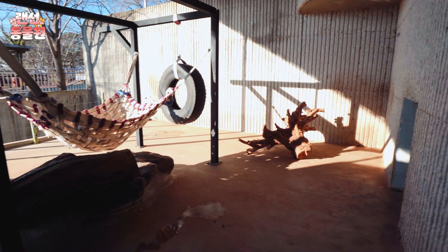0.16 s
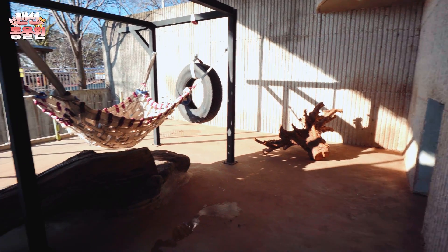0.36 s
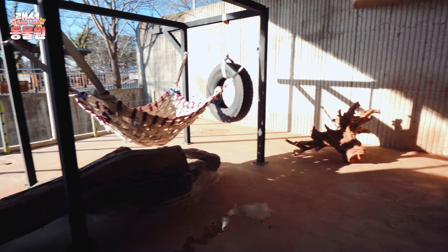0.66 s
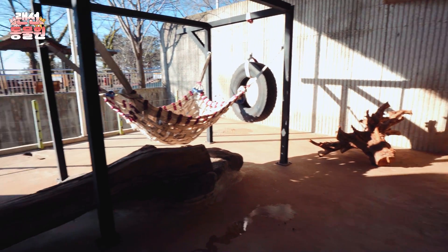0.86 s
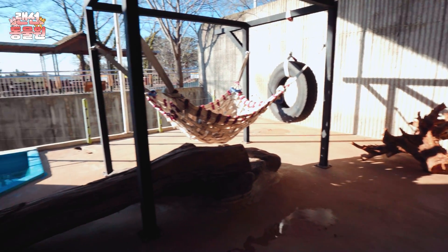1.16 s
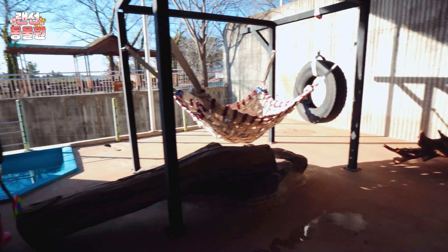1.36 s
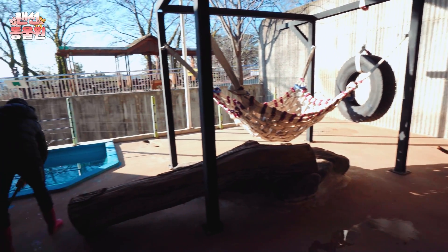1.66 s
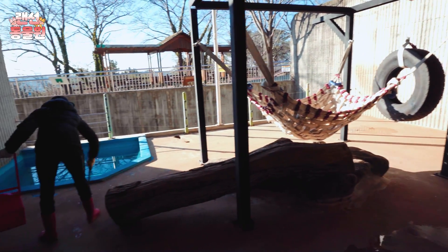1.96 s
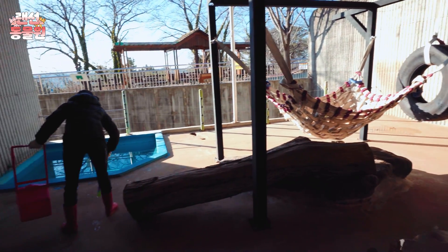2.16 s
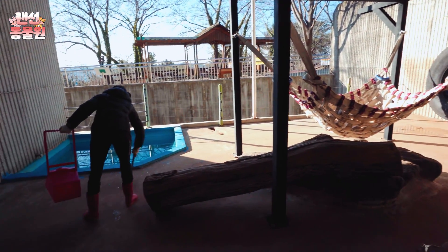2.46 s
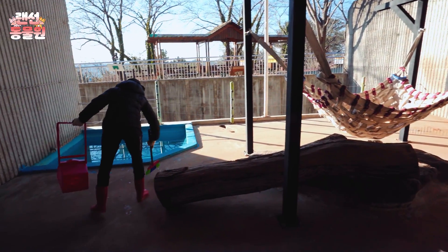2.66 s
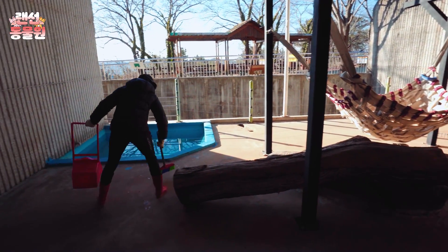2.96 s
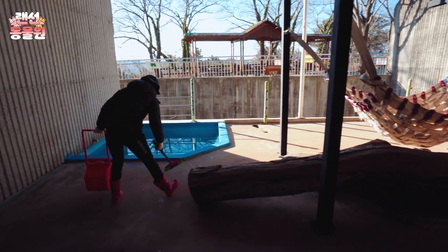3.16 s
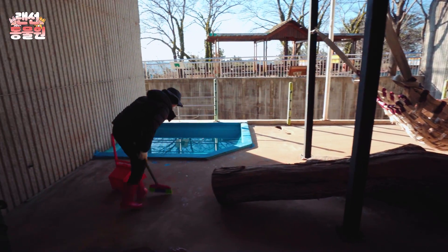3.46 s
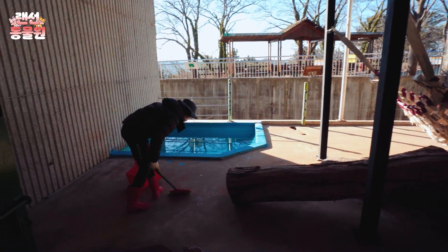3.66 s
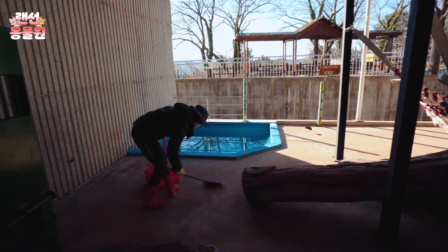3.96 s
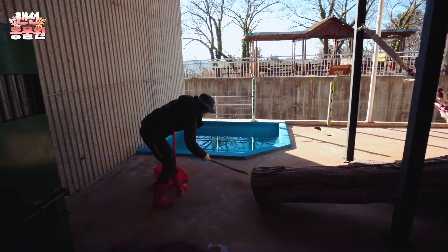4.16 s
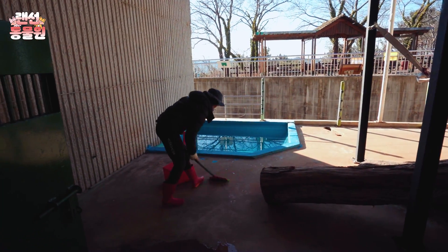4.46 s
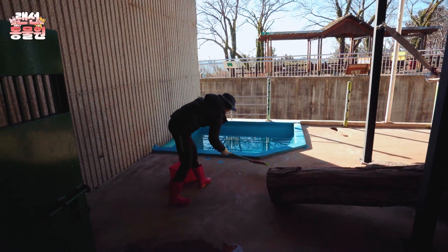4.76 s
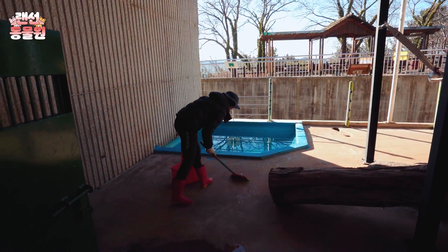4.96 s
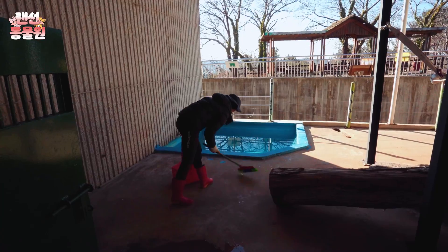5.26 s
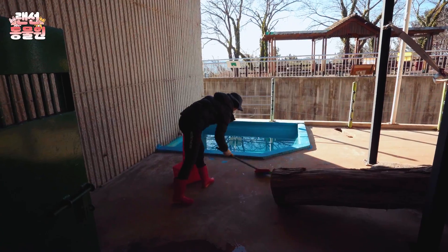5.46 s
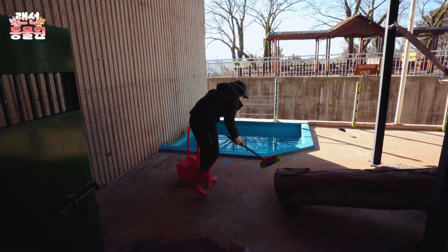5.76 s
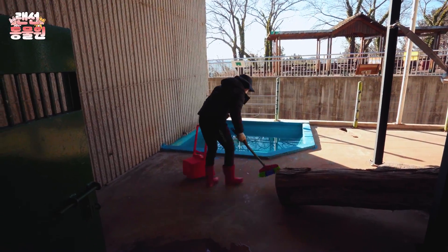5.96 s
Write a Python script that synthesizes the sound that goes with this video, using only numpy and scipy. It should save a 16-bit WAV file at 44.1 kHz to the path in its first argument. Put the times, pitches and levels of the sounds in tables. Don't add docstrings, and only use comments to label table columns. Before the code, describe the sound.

Outdoor walled enclosure with a hard floor, heard from a few metres by a small stereo microphone. First come uneven hollow plastic knocks, boot taps and scuffs, then one loud boomy set-down. Bristles brush lightly twice, the pan is nudged and scuffs, then one long rasping stroke and three pressed, fizzing strokes follow. A soft tap closes it over low distant rumble and steady hiss.

```python
import sys
import numpy as np
from scipy import signal
from scipy.fft import rfft, irfft, next_fast_len
from scipy.io import wavfile
from scipy.ndimage import uniform_filter1d

SR = 44100
rng = np.random.default_rng(int(sys.argv[2]) if len(sys.argv) > 2 else 0)


def store_wav(level_fs):
    pcm = np.round(np.clip(np.atleast_2d(level_fs), -1, 1) * 32767)
    wavfile.write(sys.argv[1], SR, pcm.T.astype(np.int16))


def field_ratio(decibels):
    return 10 ** (np.asarray(decibels, dtype=float) / 20)


N = 269010

# pitch_hz [Hz], level_db [dB], t60_s [s]
PAN = [(126, -3, 0.73), (165.6, -2, 0.72), (180, -1, 0.58), (226, -17.5, 1), (244, 1.5, 0.3),
       (281, 8.5, 0.33), (349, 7, 0.15), (374, -5.5, 0.93), (413, 0.5, 0.094), (473.8, 3, 0.18),
       (505, -35, 0.12), (583, -11, 0.13), (677, 5, 0.12), (780, -11, .15), (950, -22, .15)]


def evened(x):
    return x / np.sqrt(np.mean(x ** 2) + 1e-20)


def read(points, hz):
    f, value = np.transpose(points)
    return np.interp(np.log(hz + 1), np.log(f + 1), value)


def add(mix, s, sound):
    part = mix[round(s * SR):][:len(sound)]
    part += sound[:len(part)]


def band(x, lo_hz, hi_hz, spectrum=((1, 0), (2, 0)), order=10):
    hz = np.fft.rfftfreq(x.shape[-1], 1 / SR) + 1
    edges = 1 / np.sqrt((1 + (lo_hz / hz) ** order) * (1 + (hz / hi_hz) ** order))
    return evened(irfft(rfft(x) * edges * field_ratio(read(spectrum, hz)), x.shape[-1]))


def ports(a, b, same, lead_s=0):
    hz = np.fft.rfftfreq(N, 1 / SR)
    likeness = np.clip(read(same, hz), -1, 1)
    turn = np.exp(1j * np.pi * hz * lead_s)
    mid = rfft(a) * np.sqrt((1 + likeness) / 2)
    side = rfft(b) * np.sqrt((1 - likeness) / 2)
    return irfft(np.array([(mid + side) * turn, (mid - side) / turn]), N)


def slips(per_s, spread_db):
    size = field_ratio(spread_db * np.minimum(rng.exponential(1, N), 5)) * rng.choice([-1., 1.], N)
    return evened(size * (rng.random(N) < per_s / SR))


def resonate(x, hz, width_hz):
    turn = np.exp(2j * np.pi * np.cumsum(hz) / SR)
    r = np.exp(-np.pi * np.min(width_hz) / SR)
    smooth = signal.lfilter([1], np.convolve([1, -r], [1, -r]), x / turn)
    return evened((turn * smooth).real)


def ring_of(modes, near_db, ring, phase, rise=0.0048):
    t = np.arange(SR * 6 // 10) / SR
    hz, db, t60 = np.transpose(modes)[:, :, None]
    level = field_ratio(db + near_db - 60 * t / (t60 * ring))
    sound = (level * np.sin(2 * np.pi * hz * t + phase)).sum(0)
    sound = sound * np.sin(np.pi / 2 * np.minimum(t / rise, 1)) ** 2
    return sound / abs(sound).max()


def closing_db(u):
    return 20 * np.log10(np.clip(2 * (2 - abs(u)), 1e-4, 1))


def arch(top_s, rise_s, fall_s, square_rise, square_fall):
    t = np.arange(max(top_s - 2 * rise_s, 0), top_s + 2 * fall_s, 1 / SR)
    u = (t - top_s) / np.where(t < top_s, rise_s, fall_s)
    shape_db = -20 * abs(u) ** np.where(u < 0, square_rise, square_fall)
    return t[0], u, shape_db + closing_db(u)


def air():
    # pitch_hz [Hz], level_db [dB per Hz]
    hiss_spectrum = [(65, -35), (110, -0.5), (153, -6), (223, -12.0), (479, -15.5), (1410, -20.5),
                     (1810, -21.0), (2180, -21.5), (3230, -22.5), (15600, -36)][:-1]
    # pitch_hz [Hz], likeness [-1 to 1]
    air_same = [(60, 0.79), (180, 0.87), (550, 0.71), (1650, 0.35), (4970, -0.14), (15000, -0.2)]
    # time_s [s], level_db [dB]
    rumble = [(0, -61), (.5, -66), (.97, -65), (1.3, -69.5), (1.9, -70), (2.4, -70), (3.3, -68.5),
              (4.15, -65), (4.6, -68), (5.4, -69), (5.75, -68), (6.1, -68)]
    # pitch_hz [Hz], level_db [dB per Hz]
    ground = [(12, -33), (20, -4), (65, 1.5), (86, 2), (103, -14), (140, -11.5), (180, -34), (310, -120)]
    a, b, c, d = rng.standard_normal((4, N))
    hiss = field_ratio(-58.5) * band(ports(a, b, air_same), 146, 18500, hiss_spectrum)
    swell = field_ratio(np.interp(np.arange(N) / SR, *np.transpose(rumble)))
    return hiss + swell * band(ports(c, d, air_same), 15, 150, ground)


def walls(x, wet_db):
    # pitch_hz [Hz], t60_s [s]
    decay = [(100, 1), (300, 0.76), (1000, 0.68), (4000, 0.59), (12000, 0.42)]
    taps = np.zeros((2, SR))
    at = np.arange(400, SR - 20, 20) + rng.integers(0, 20, (2, (SR - 401) // 20))
    np.put_along_axis(taps, at, rng.choice([-1., 1.], at.shape), 1)
    taps = taps[0] + 0.032 * taps[1] * np.array([[1], [-1]])
    hz, t, z = signal.stft(taps, SR, nperseg=256)
    tail = signal.istft(z * field_ratio(-60 * t / read(decay, hz)[:, None]), SR, nperseg=256)[1]
    return x + field_ratio(wet_db) * signal.fftconvolve(x, tail / np.linalg.norm(tail[0]), axes=1)[:, :N]


def rim(x):
    # pitch_hz [Hz], width_hz [Hz], level_db [dB]
    peaks = [(572.3, 14, 6), (812, 8.4, 5), (980, 140, -9), (1153, 29, -11)]
    t = np.arange(2000) / SR
    ring = sum(field_ratio(db) * width * np.exp(-np.pi * width * t) * np.sin(2 * np.pi * hz * t)
               for hz, width, db in peaks)
    return evened(evened(signal.oaconvolve(x, ring)[:N]) + 2.2 * band(x, 256, 1400, order=6))


def pan_ring(centre_hz, ring, chance):
    octaves = abs(np.log2(np.transpose(PAN)[0] / centre_hz))
    near_db = -16 * octaves ** 0.38 + 2.0 * chance
    return ring_of(PAN, near_db[:, None], ring, 3.14 * chance[::-1, None])


def drags():
    # top_s [s], rise_s [s], fall_s [s], rim_db [dB], body_db [dB above the rim]
    slides = [(.544, 0.025, 0.058, -41, 4), (.585, 0.034, 0.057, -41, -17), (.652, 0.026, 0.083, -42, -6),
              (.69, .03, 0.071, -48, 1), (0.927, 0.0284, 0.15, -47, 19.5), (1.29, 0.31, 0.6, -65.5, 6),
              (1.66, 0.061, 0.097, -54.5, 6.5), (3.26, 0.025, 0.13, -63, 5),
              (3.305, 0.083, 0.059, -50.5, -11), (3.53, 0.03, 0.13, -68, 12),
              (3.618, 0.12, .05, -56.5, -17)]
    buzz, shake = np.zeros((2, N))
    for top_s, rise_s, fall_s, db, body_db in slides:
        s, u, shape_db = arch(top_s, rise_s, fall_s, 1.3, 0.88)
        add(buzz, s, field_ratio(db + shape_db))
        add(shake, s, field_ratio(db + body_db + shape_db))
    return buzz, shake


def dustpan():
    # start_s [s],
    # peak_db [dB], centre_hz [Hz], edge_db [dB above peak], ring [factor on t60]
    pan_knocks = [(0.054, -39, 263, -5, 1), (0.199, -21, 375, -3.5, 0.49), (0.217, -25.5, 353, -12, 0.16),
                  (0.234, -28.5, 416, -1.5, 0.79), (0.299, -33, 300, -1.5, 0.47), (0.317, -30, 276, -11, 0.45),
                  (0.331, -31.5, 266, -0.5, 0.33), (0.538, -39.5, 180, 12, 0.58), (0.58, -41, 121, -1, 0.2),
                  (0.599, -37.5, 232, -16, 0.5), (0.647, -37, 300, -5, 0.29), (0.689, -42, 258, 10, 0.37),
                  (0.739, -42.5, 296, -13, 0.69), (1.259, -49, 163, 6, 1), (1.384, -44.5, 166, -10, 0.21),
                  (1.424, -49.5, 275, -26, 0.43), (1.559, -47, 297, -2, 0.43), (1.64, -37, 282, -12, 0.34),
                  (1.689, -50, 270, -8, 0.25), (1.868, -50, 283, 0, 1),
                  (3.262, -45, 158, -18, 0.48), (3.299, -47, 490, -12, 0.56), (3.329, -53, 310, -14, 0.32),
               (3.523, -49, 244, -28, 0.37), (3.638, -34, 180, 1, 0.67), (3.713, -44, 173, -14, 0.83),
               (3.809, -58, 170, -10, 0.56), (4.052, -41, 236, -4, 0.41), (6.047, -48.5, 330, 12, 0.43)]
    dry_taps = [(1.194, -37.5, 243, -8, 0.079), (3.087, -46.5, 217, 17.5, 0.08),
                (3.118, -48, 240, 11, 0.14), (3.252, -54, 245, -12, 0.28), (4.512, -35.5, 351, -11, 0.12),
                (4.52, -49, 272, -2, 0.084), (6.09, -47.5, 336, -9, 0.22)]
    # peak_db [dB], centre_hz [Hz], edge_db [dB above peak], ring [factor on t60]
    thuds = [(-36.5, 140, -25, 0.85), (-40, 270, -20, 0.28), (-48, 330, -25, 0.5), (-33, 580, -4, 0.84),
             (-49, 230, -6, 0.36), (-36, 320, -3, 0.28)]
    blows_s = [.33, 3.638, 3.715, .201, 6.052, .893]
    # pitch_hz [Hz], level_db [dB], t60_s [s]
    drop = [(130.7, -8, 0.74), (157, -0.5, 0.59), (171.6, 0.5, 0.39), (220.6, -3.5, 0.76), (249, -10.5, 1),
            (279.6, 11, 0.27), (300, -9, 0.31), (350, -0.5, 0.18), (419, -0.5, 0.33), (427.7, -9, 0.47),
            (530, -17, 0.14), (568, -7.5, 0.12), (630, -33, 0.11), (880, -22, 0.3), (890, -25, 0.09),
            (1060, -36, 0.12), (1320, -18.5, 0.29)]
    drop_s, drop_db = 0.8915, -14.5
    out, edge, t = np.zeros(N), np.zeros(N), np.arange(SR // 4) / SR

    knocks = pan_knocks + dry_taps + [(s, *row) for s, row in zip(blows_s, thuds)]
    chance = rng.standard_normal((len(knocks), len(PAN)))
    for (s, db, hz, edge_db, ring), c in zip(knocks, chance):
        add(out, s, field_ratio(db - 0.5) * pan_ring(hz, ring, c))
        fade_db = -60 * t / (0.31 * ring)
        add(edge, s, field_ratio(db + edge_db - 15.5 + fade_db) * np.minimum(t / 0.0032, 1))

    low_boost_db = 4 * (abs(np.array(drop)[:, :1] / 165 - 1) < .1)
    phase = 2 * np.pi * rng.random((len(drop), 1))
    add(out, drop_s, field_ratio(drop_db) * ring_of(drop, low_boost_db, 0.98, phase, rise=0.0011))
    add(edge, drop_s, field_ratio(-46.5 - 60 * t / 0.21))

    out *= field_ratio(1.3 * band(rng.standard_normal(N), 8, 39))
    grit = slips(2500, 2.0)
    rattle = field_ratio(1.7 * band(rng.standard_normal(N), 12, 86))
    shaken = evened(signal.oaconvolve(grit, pan_ring(226.5, 0.13, np.zeros(len(PAN))))[:N])
    buzz, shake = drags()
    out += shake * shaken + (edge + buzz) * rim(grit) * evened(rattle)
    return signal.sosfilt(signal.butter(3, 100, "high", fs=SR, output="sos"), out)


def strokes():
    # top_s [s], rise_s [s], fall_s [s], pressure_db [dB], fizz_db [dB above pressure]
    light = [
        (2.031, 0.15, 0.15, -45, 1),
        (2.558, 0.13, 0.14, -45, 1),
    ]
    firm = [
        (4.669, 0.16, 0.15, -42.5, 7.7),
        (5.14, 0.095, 0.14, -44, 7.3),
        (5.51, 0.075, 0.15, -45, 9.7),
    ]
    scuffs = [(.03, .12, .17, -53.5, 2.5), (0.511, 0.052, 0.14, -50, 5), (.96, 0.036, 0.12, -58.5, 7),
              (3.66, 0.065, 0.095, -51.5, 1.5), (6.07, 0.01, 0.1, -68, 2)]
    bumps = [(1.66, 0.047, 0.088, -51, -35), (1.88, 0.058, 0.037, -63.5, 7), (3.3, 0.063, 0.18, -67.5, -1),
             (3.58, 0.081, 0.12, -56.5, -14), (3.72, .02, 0.05, -62.5, 3), (4.41, 0.06, .06, -66, -12),
             (6.052, 0.005, .03, -54.5, -12)]
    long = [
        (4.1, 0.28, 0.12, -43, 7),
    ]
    # head_db [dB], song_db [dB], tuft_hz [Hz], rise and fall squareness [exponent]
    grips = [
        (-14, -17, 2140, 4.2, 2.5),
        (-9.5, -20, 4300, 4.3, 2.38),
        (-10, -49, 3170, 3.3, 1.38),
        (-2.5, -8, 2130, 1.8, 1.02),
        (-9.5, -19, 4200, 2.86, 2.2),
    ]
    # head_db [dB], fizz_db [dB], song_db [dB], tuft [octaves]
    leans = [
        (3, 0.5, 13, 0.035),
        (-5, 2.5, 4, .1),
        (9, -0.5, 3, -.1),
        (7.5, -1.5, -1, -.03),
        (-7, 2, -1, .1),
    ]
    gains, pitch = np.zeros((4, N)), np.zeros(N)
    for rows, grip, lean in zip((light, firm, scuffs, bumps, long), grips, leans):
        head_db, song_db, tuft_hz, *square = grip
        for top_s, rise_s, fall_s, db, fizz_db in rows:
            s, u, shape_db = arch(top_s, rise_s, fall_s, *square)
            above_db = (0, fizz_db + lean[1] * u, head_db + lean[0] * u, song_db + lean[2] * u)
            for gain, above in zip(gains, above_db):
                add(gain, s, field_ratio(db + shape_db + above))
            add(pitch, s, field_ratio(db + shape_db) * tuft_hz * 2 ** (lean[3] * u))
    tuft_curve = (pitch + 1e-9 * grips[0][2]) / (gains[0] + 1e-9)
    return (*gains, tuft_curve)


def broom():
    # start_s [s], peak_db [dB], fizz_db [dB above peak], t60_s [s]
    landings = [(.108, -46, 18, 0.067), (3.802, -38, 5, 0.072), (0.185, -31.5, -11, 0.049),
                (0.2004, -39, -24, 0.27), (0.3002, -38, -31, 0.26), (0.8936, -32, 1, 0.12),
                (0.917, -27, 7.5, 0.098), (0.9714, -35.5, 11, 0.043), (1.2594, -53, 17, 0.13),
                (1.3528, -41, -28, 0.075), (1.821, -33, -21, 0.081), (3.5695, -35, 1, 0.17),
                (4.481, -28.5, 1.5, 0.15), (5.005, -32.5, 3, 0.26), (5.389, -30, 4, 0.22),
                (6.0473, -42, 13, 0.03)]
    # pitch_hz [Hz], level_db [dB per Hz]
    bristles = [(240, -38), (400, 1.5), (552, -1.5), (695, -1.0), (944, 0), (1100, 4.5), (1690, -1),
                (2230, -1.5), (2890, -2.0), (4300, -1.5), (8580, -3.0), (12600, 3.5), (15600, -3)][:-1]
    # pitch_hz [Hz], likeness [-1 to 1]
    broom_same = [(60, 0.65), (150, 0.89), (380, 0.95), (950, 1), (2380, 0.96), (5980, 0.5), (15000, 0.089)]
    # pitch_hz [Hz], width_hz [Hz], level_db [dB]
    hollow = [(708, 160, -13.5)]
    judder = field_ratio(.5 * evened(uniform_filter1d(rng.standard_normal(N), size=200)))
    rasp = ports(slips(20000, 2.0), slips(20000, 2.0), broom_same, lead_s=1.6e-5) * judder
    body, fizz, head, song, tuft_hz = strokes()

    t = np.arange(SR // 4) / SR
    for s, db, fizz_db, t60 in landings:
        puff = field_ratio(db - 18.5 - 60 * t / t60) * np.minimum(t / 0.0022, 1)
        add(body, s - .0015, puff)
        add(fizz, s - .0015, puff * field_ratio(fizz_db))
        add(head, s + 0.0045, puff * field_ratio(-4.5))

    drift = uniform_filter1d(uniform_filter1d(rng.standard_normal(N), size=1500), size=1500)
    song = song * field_ratio(1.8 * evened(drift)) * resonate(rasp, tuft_hz, tuft_hz * 0.43)

    pressed = abs(np.arange(N) / SR - 2.3) > .5
    notes = sum(field_ratio(db) * resonate(rasp, np.full(N, hz), width) for hz, width, db in hollow)
    full_head = band(rasp, 570, 2260, bristles, order=6) + notes
    head_sound = np.where(pressed, full_head, band(rasp, 700, 2000, order=12))
    body_sound = band(rasp, 2040, 5880, bristles, order=6)
    fizz_sound = band(rasp, 6500, 18000, bristles, order=6)
    return body * body_sound + fizz * fizz_sound + head * head_sound + song


def scene():
    pan = dustpan()
    deep = signal.sosfiltfilt(signal.butter(2, 210, fs=SR, output="sos"), pan)
    lead = signal.hilbert(deep, next_fast_len(N))[:N].imag
    side = 0.053 * deep - 0.17 * lead + 0.86 * np.gradient(pan)
    pan = pan + side * np.array([[1], [-1]])
    return walls(broom(), -12) + walls(pan, -11) + air()


def top_cut(x):
    return signal.sosfilt(signal.butter(12, 17000, fs=SR, output="sos"), x)


def record(dry):
    edge = signal.firwin(2047, 15790, window=("kaiser", 10), fs=SR)
    return top_cut(signal.oaconvolve(dry, edge[None], "same"))


dry = scene()
out = record(dry)
store_wav(out)
```